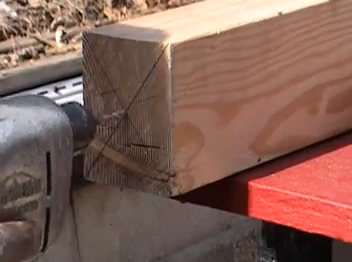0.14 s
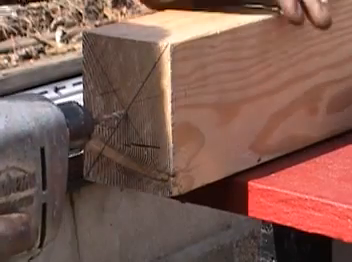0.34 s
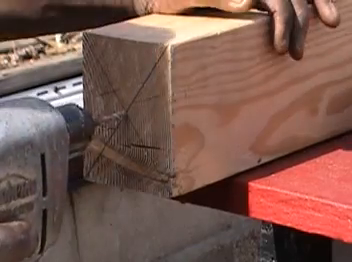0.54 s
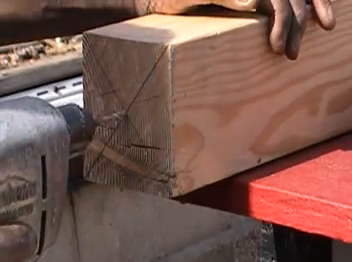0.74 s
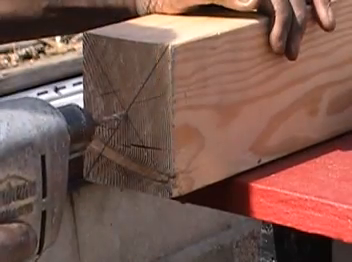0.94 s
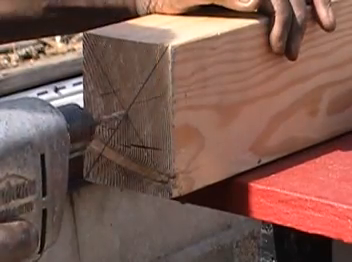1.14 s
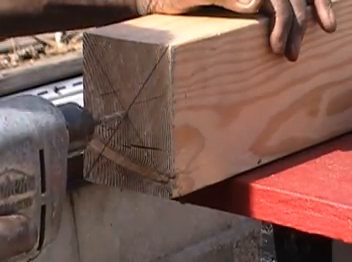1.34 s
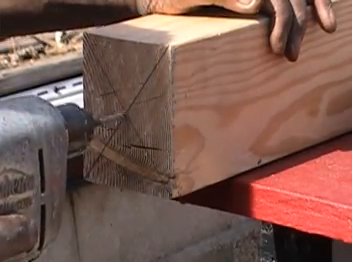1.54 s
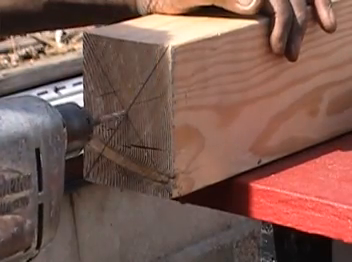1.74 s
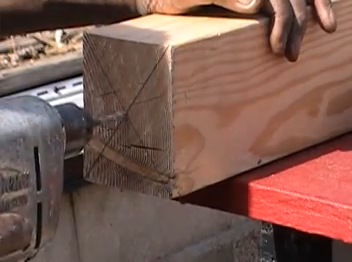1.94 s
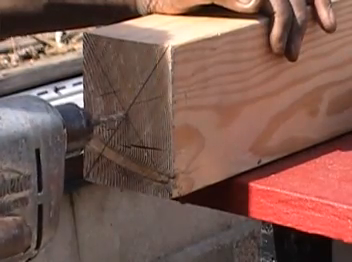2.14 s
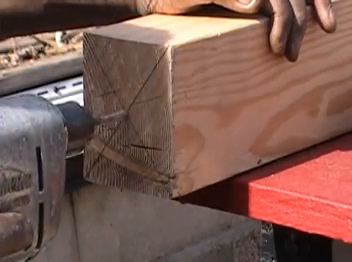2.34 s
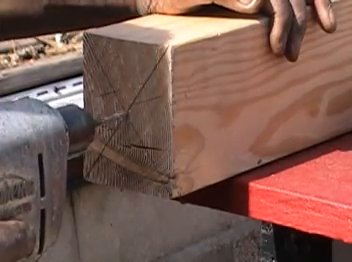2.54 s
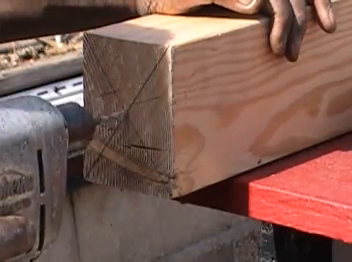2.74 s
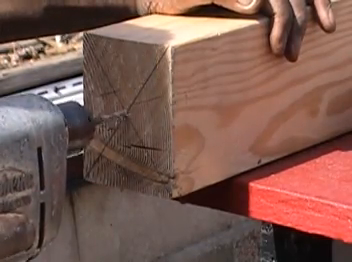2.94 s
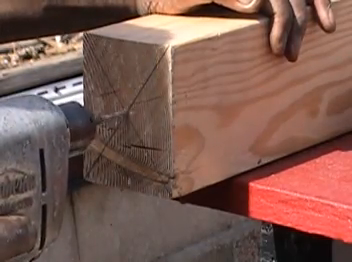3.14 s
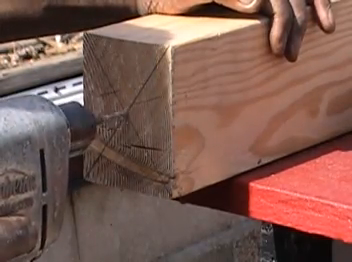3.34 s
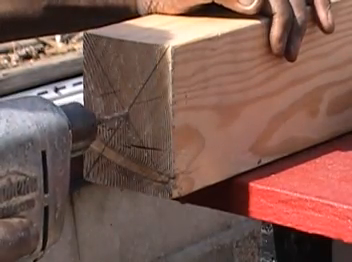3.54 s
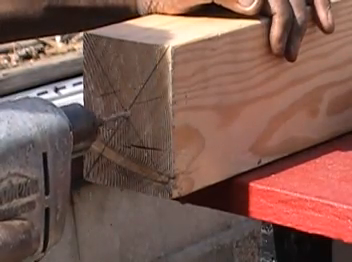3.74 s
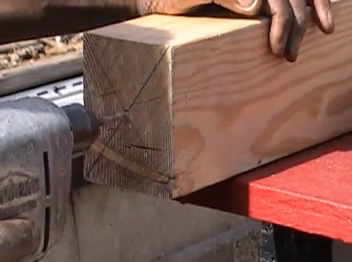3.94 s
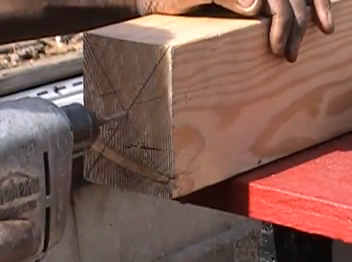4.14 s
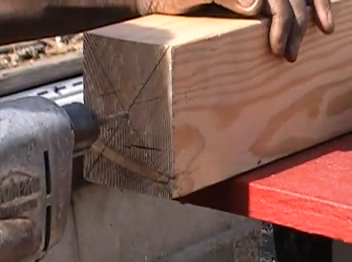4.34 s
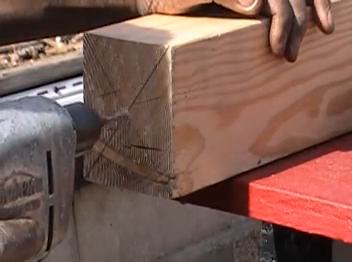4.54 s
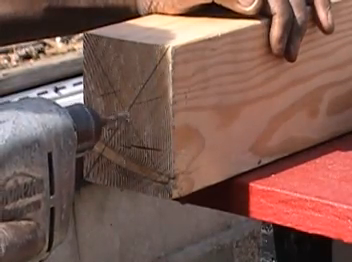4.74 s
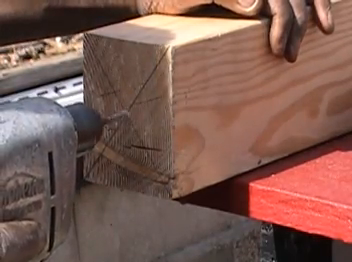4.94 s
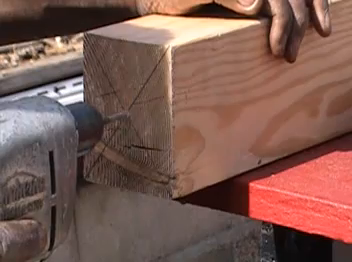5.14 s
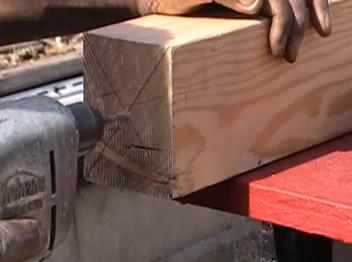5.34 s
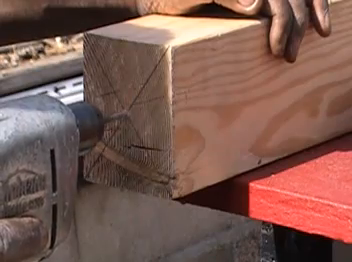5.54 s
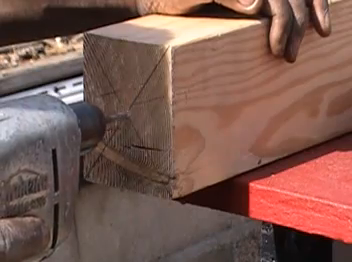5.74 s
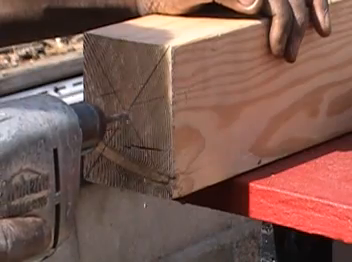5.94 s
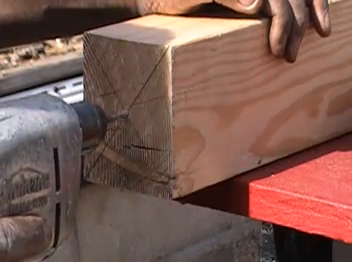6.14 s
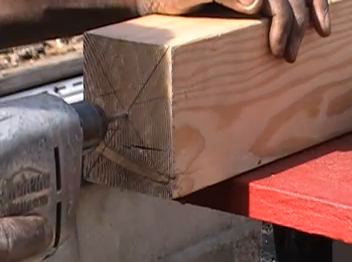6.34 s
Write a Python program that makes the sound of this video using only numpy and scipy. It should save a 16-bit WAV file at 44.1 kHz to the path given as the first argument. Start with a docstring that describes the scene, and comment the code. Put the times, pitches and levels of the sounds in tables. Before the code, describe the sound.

Soft rustles and quick small ticks in open air, then a loud clattering electric drill boring wood in two pulls, the second running to the end.

```python
"""A corded hand drill bores into the end grain of a wooden beam outdoors, a metre away.
Its loose gears rattle as dense random taps and clashes that ring the metal housing; a smoothed share
of the force drones in the beam, and wavering sines make a faint whine and a thin squeal.
Filtered noise gives the open air and rumble behind it, a gliding sine the low hum, and noise bursts the
regular ticks, single ticks, trigger click and soft rustles heard before the drill starts."""
import sys
import numpy as np
from scipy import signal
from scipy.fft import rfft, irfft
from scipy.io import wavfile
from scipy.ndimage import uniform_filter1d

SR = 44100
rng = np.random.default_rng(int(sys.argv[2]) if len(sys.argv) > 2 else 0)


def pcm_store(signal):
    """Save signal as 16-bit PCM."""
    levels = np.round(np.clip(np.atleast_2d(signal), -1, 1) * 32767)
    wavfile.write(sys.argv[1], SR, levels.astype(np.int16).T)


N = 282681
PAD = N + 8192  # room for filter tails, in samples
T = np.arange(N) / SR  # seconds
HZ = np.fft.rfftfreq(PAD, 1 / SR) + 1  # shifted by 1 Hz so its logarithm exists

# Trigger pulls. Each row: start in seconds, power cut in seconds (the last lies past the end),
# beam drone against the rattle in dB, extra drone just after the start in dB.
TRIGGER_PULLS = [(1.074, 2, -11.5, 5), (2.196, 7, -14.5, 11)]
# How hard the gears rattle as the hand leans on the drill. Each row: time in seconds, level in dB.
HAND_LOAD = [(1.07, -22.5), (1.25, -23.5), (1.35, -20.5), (1.55, -21.5), (1.68, -24.5), (1.78, -23.5),
             (1.95, -29.5), (2.04, -27), (2.19, -24), (2.3, -19.5), (2.45, -22.5), (2.65, -24),
             (2.8, -20.5), (2.98, -25.5), (3.2, -22), (3.5, -25.5), (3.7, -20.5), (3.9, -22), (4.17, -23.5),
             (4.45, -19.5), (4.6, -22.5), (4.8, -19.5), (5.0, -20.5), (5.45, -19), (5.6, -22),
             (5.75, -19.5), (6.15, -22), (6.41, -21.5)]
# Gear clashes at set times, from faint to loud. Each row: time in seconds, strength of the knock in dB.
GEAR_CLASHES = [(1.0748, -4.5), (1.1465, -2.5), (1.1643, 1), (1.1962, -4), (1.227, -10), (1.2444, 2),
                (1.2878, -13), (1.3841, -0.5), (1.4263, -1.5), (1.448, -0.5), (1.4699, -12), (1.5208, -1),
                (1.5637, -1), (1.6028, -3), (1.661, -18), (1.678, -5.5), (1.771, -2.5), (1.8948, -4.5),
                (2.191, -3), (2.231, 2), (2.2866, -4), (2.3215, -2.5), (2.354, -2), (2.3789, -2.5),
                (2.4208, -5), (2.4632, -1), (2.4973, -1), (2.596, -7), (2.618, -12), (2.6385, 2.5),
                (2.7185, 0), (2.746, -10), (2.7774, -3), (2.853, 1.5), (2.8875, -3), (2.9111, -6),
                (2.9383, -5.5), (3.0203, -1.5), (3.0624, 0), (3.0962, 0), (3.1399, -3), (3.1725, -7),
                (3.189, -7), (3.2115, -12), (3.3257, -0.5), (3.357, 1.5), (3.3768, 0), (3.407, -3.5),
                (3.4398, -2.5), (3.5056, -1), (3.614, -8), (3.647, -6), (3.7009, 2), (3.7316, -0.5),
                (3.774, -1), (3.822, 2), (3.8777, -16), (3.8958, -11), (3.9338, -2), (3.9546, -2.5),
                (4.0103, -3.5), (4.0466, 0), (4.067, 2.5), (4.1135, -6.5), (4.203, -19), (4.243, -2),
                (4.29, -2), (4.3214, -11), (4.357, -5), (4.4317, -7), (4.4612, -3), (4.5948, -3),
                (4.6194, -11), (4.6856, -25), (4.7421, 1), (4.8176, -2), (4.8567, -16), (4.8817, -8),
                (4.9234, -9), (4.954, -2.5), (4.975, -3), (5.0324, -7), (5.0966, -4), (5.152, -4),
                (5.266, -3), (5.3544, -6.5), (5.428, 0.5), (5.4519, -11), (5.48, -16), (5.5087, -0.5),
                (5.5541, -3.5), (5.5975, -10), (5.6399, -9), (5.6797, -6), (5.7556, -7), (5.819, -8),
                (5.865, -12), (5.9465, -8), (5.9762, -0.5), (6.0104, -7), (6.0274, 2), (6.06, -5),
                (6.1026, 1), (6.1628, -4), (6.1915, 0), (6.2184, -4.5), (6.3291, 0.5), (6.3485, -5),
                (6.3685, -5.5), (6.3871, -11)]
# Spectrum of the metal housing. Each row: frequency in Hz, relative level in dB per Hz.
HOUSING_SPECTRUM = [(1060, -63.5), (1800, -28), (2300, -34.5), (2470, -14.5), (2950, -20), (3440, -2),
                    (4680, -13), (5210, -5.5), (6890, -5.5), (8180, -0.5), (9280, -8.5), (10300, -10.5),
                    (13900, -23.5), (14400, -52), (15500, -56)]
# Resonances of the housing. Each row: frequency in Hz, width in Hz (at least 1/45 of it is used), hump in dB.
HOUSING_RESONANCES = [(2160, 120, 23), (3148, 86, 9), (3530, 160, -3), (4140, 50, 0), (5343, 67, 5.5),
                      (5930, 42, 3.5), (6340, 200, 2.5), (6700, 73, 2.5), (7550, 640, 4), (8440, 320, 4.5),
                      (9090, 40, 7.5), (9500, 630, 6.5), (11340, 160, 4)]
# Spectrum of the wooden beam. Each row: frequency in Hz, relative level in dB per Hz.
BEAM_SPECTRUM = [(59, -60), (100, -17), (308, -9.5), (421, -7.5), (514, -7.5), (627, -4), (1170, -3.5),
                 (3000, 1.5), (3900, -47), (6600, -120)]
# Resonances of the beam. Each row: frequency in Hz, width in Hz, hump in dB.
BEAM_RESONANCES = [(934, 56, 7), (1042, 46, 5), (1740, 270, 1)]
# Low rings of the beam, which change strength as the hole deepens.
# Each row: frequency in Hz, width in Hz, level in a shallow hole and in a deep one in dB against the push.
BEAM_LOW_RESONANCES = [(125, 50, -25, -35.5), (199, 75, -21, -28), (426.5, 34, -21, -18.5),
                       (640.4, 51, -21, -17), (1357, 48, -12.5, -22)]
# Whine, one list for each spell. Each row: time in seconds, centre pitch in Hz, centre level in dB.
WHINE_SPELLS = [
    [(1.72, 1710, -40), (1.85, 1723, -43), (2.05, 1750, -47), (2.18, 1713, -58)],
    [(2.7, 1440, -68), (2.8, 1484, -38), (2.92, 1550, -56), (3.05, 1556, -44)],
    [(6.05, 1594, -56), (6.2, 1620, -44), (6.41, 1630, -41)],
]
# Thin high ring. Each row: time in seconds, centre level in dB.
SQUEAL_LEVEL = [(1.2, -57), (1.4, -50), (1.7, -44), (1.9, -47), (2.05, -58)]
# Stereo balance of the drill. Each row: frequency in Hz, left minus right of the shared sound in dB,
# gain of the unrelated part in dB.
STEREO_BALANCE = [(300, -0.9, -66), (930, -0.3, -60), (3600, 0.1, -70.5), (4180, 0, -8), (5300, 5, -10.5),
                  (7200, 1.5, -13), (9600, 0, -15), (11300, -7, 1.5), (12750, -9, 3), (14900, 29, -2)]
# Single ticks, the last two the click of the trigger.
# Each row: time in seconds, strength of the body in dB, edge against body in dB.
SINGLE_TICKS = [(0.2183, -56, 8), (0.5988, -45, -3), (1.038, -43, -10), (1.046, -52, 5)]
# Body rings of a tick. Each row: frequency in Hz, width in Hz, relative level in dB.
TICK_RESONANCES = [(1000, 600, 3), (2300, 900, 0), (3500, 900, -4), (4700, 900, -9)]
# Soft high rustles. Each row: loudest moment in seconds, relative level in dB, Gaussian spread in seconds.
RUSTLE_PUFFS = [(0.048, -66, 0.033), (0.501, -54.5, 0.008), (0.54, -59, 0.007), (.815, -68, 0.0045)]
# Spectrum of the open air. Each row: frequency in Hz, relative level in dB per Hz.
AIR_SPECTRUM = [(12, -6), (20, 13.5), (71, -5), (170, -7), (373, -3), (1070, -9), (3640, -23.5),
                (5040, -32), (8200, -31), (11400, -33), (13000, -61)]
# Stereo spread of the air. Each row: frequency in Hz, gain of the side signal in dB.
AIR_SIDE_GAIN = [(60, -14), (300, -15), (1300, -9), (3000, -5), (7000, -1)]
# Swelling rumble. Each row: time in seconds, relative level in dB.
RUMBLE_SWELL = [(0.0, -55), (0.46, -46.5), (1.3, -59), (1.55, -45), (2.0, -49), (2.7, -58), (3.0, -66),
                (4.8, -59.5), (6.41, -62)]
# Gliding low hum. Each row: time in seconds, pitch in Hz, relative level in dB.
HUM_GLIDE = [(0.0, 81, -59), (0.074, 86.3, -75), (0.37, 68, -55.5), (1.22, 69.8, -56.5), (1.344, 77.5, -66),
             (1.5, 74.5, -68)]

SPIN_UP_S, START_DB = 0.008, -5  # the motor's drive starts this much softer and swells
COAST_DB_PER_S, COAST_DRONE_DB_PER_S = -180, -130  # run-down of rattle and drone once the power is cut
JOLT_S = 0.063  # settling time of the extra drone
TAPS_PER_S = 600
WOBBLE_DB, FLUTTER_DB = 0.56, 2  # slow and quick unevenness of the rattle
WOBBLE_PER_S, FLUTTER_PER_S = 60, 200
MAINS_RIPPLE_HZ, RIPPLE_DB = 120, 0.5
SMALL_CLASHES_PER_S = 25
SMALL_CLASH_DB, SMALL_CLASH_SPREAD_DB = 6.5, 2  # strength against the rattle
BOUNCE_S, BOUNCE_GAIN = 0.00324, 0.41
CHATTER_DB = -24  # against the strength of the knock
TOP_END_HZ, TOP_END_BLUR = 10800, 0.79  # above this the drill sounds smoother, like fan hiss: smeared share
DEEPENS_S, DEEPENS_OVER_S = 2.97, 0.14
SQUEAL_HZ = 11420
# a steady train of small ticks that fades towards its end
TRAIN_START_S, TRAIN_PERIOD_S, TRAIN_COUNT = .2418, .0669, 11
TRAIN_DB, TRAIN_EDGE_DB, TRAIN_SPREAD_DB = -42.5, -12, 2.5  # body strength, edge gain, random spread
TRAIN_FADES_S, TRAIN_FADE_DB_PER_S = .7, -29
AIR_MID_DB, AIR_SIDE_DB = -50.5, -53  # rms before the final filters
TOP_HZ = 15700


def drill():
    """Gear force rings the housing and pushes the beam; tonal rings, whine and squeal lie on top."""
    load_db = curve([HAND_LOAD], column=1, outside=-23)
    rattle_db = load_db + trigger(COAST_DB_PER_S)
    drone_level_db = load_db + trigger(COAST_DRONE_DB_PER_S) + drone_db()
    shake, knocks = rattle(), clashes(rattle_db)
    force = undb(rattle_db) * shake + knocks
    push = undb(drone_level_db) * level(fade(shake, 0.0047), 0)
    push += undb(-36) * uniform_filter1d(knocks, size=200)
    shared, unrelated = [housing(f) + beam(push) for f in contact_forces(force)]
    return stereo(shared + beam_low_rings(push) + whine() + squeal(), unrelated)


def trigger(coast_db_per_s):
    """Motor drive in dB: off, a quick swell at each pull, a steady fall once the power is cut."""
    out = np.full(N, -90.)
    for on, cut, *_ in TRIGGER_PULLS:
        swell = START_DB * np.exp(-(T - on).clip(0) / SPIN_UP_S)
        coast = coast_db_per_s * (T - cut).clip(0)
        out[T >= on] = (swell + coast)[T >= on]
    return out


def rattle():
    """Force on the gear teeth: random uneven taps that bunch up as the bit wobbles and the torque ripples."""
    bunch = undb(WOBBLE_DB * walk(WOBBLE_PER_S) + FLUTTER_DB * walk(FLUTTER_PER_S))
    ripple = undb(RIPPLE_DB * np.sin(2 * np.pi * MAINS_RIPPLE_HZ * T))
    size = undb(np.minimum(2.5 * rng.exponential(size=N), 9))
    taps = (rng.random(N) < TAPS_PER_S / SR) * size
    return level(bunch * ripple * (fade(taps, 0.0002) + 0.63), 0)


def clashes(rattle_db):
    """Force of the knocks: a sharp peak that bounces once, with brief chatter around the timed ones."""
    small_db = rattle_db + SMALL_CLASH_DB + SMALL_CLASH_SPREAD_DB * noise()
    small = (rng.random(N) < SMALL_CLASHES_PER_S / SR) * undb(small_db)
    timed = np.zeros(N)
    for s, db in GEAR_CLASHES:
        timed[int(s * SR)] = undb(db)
    hits = timed + small
    bounced = hits + BOUNCE_GAIN * np.roll(hits, int(BOUNCE_S * SR))
    sharp = fade(fade(bounced, 0.00016), 0.00069) / (0.00036 * SR)
    chatter = np.convolve(timed, np.hanning(400), "same")
    return sharp + undb(CHATTER_DB) * chatter


def contact_forces(force):
    """Crisp force with a partly smeared top end, and a smoothed noisy copy for the unrelated stereo part."""
    blurred = np.sqrt(fade(force ** 2, 0.0031) / (0.0043 * SR))
    crisp = force * np.sign(noise())  # each contact pushes one way or the other
    smear_in = np.sqrt(TOP_END_BLUR) * blurred * noise()
    crisp_out = (1 - np.sqrt(1 - TOP_END_BLUR)) * crisp
    top = signal.butter(4, TOP_END_HZ, "high", fs=SR, output="sos")
    crisp += signal.sosfiltfilt(top, smear_in - crisp_out)
    return crisp, blurred * noise()


def housing(force):
    """The metal housing rings under the gear force."""
    return colour(force, even(shape(HOUSING_SPECTRUM, rings=HOUSING_RESONANCES)))


def beam(push):
    """The wooden beam drones: noise under the push, coloured by the wood."""
    return colour(push * noise(), even(shape(BEAM_SPECTRUM, rings=BEAM_RESONANCES)))


def drone_db():
    """Beam drone against the rattle in dB: a jolt at each start that settles."""
    out = np.zeros(N)
    for on, _, below_db, jolt_db in TRIGGER_PULLS:
        out[T >= on] = (below_db + jolt_db * np.exp(-(T - on).clip(0) / JOLT_S))[T >= on]
    return out


def beam_low_rings(push):
    """Narrow noise bands ride on the push and change strength as the hole deepens."""
    depth = 1 / (1 + np.exp(-(T - DEEPENS_S) / DEEPENS_OVER_S))
    out = np.zeros(N)
    for hz, width, shallow_db, deep_db in BEAM_LOW_RESONANCES:
        ring = level(band(noise(), hz - width / 2, hz + width / 2), 0)
        out += push * undb(shallow_db + (deep_db - shallow_db) * depth) * ring
    return out


def whine():
    """An unsteady sine follows the pitch and level of each spell."""
    hz = curve(WHINE_SPELLS, column=1, outside=1500)
    return waver(hz, curve(WHINE_SPELLS, column=2, outside=-160), 16)


def squeal():
    """A thin high sine wavers around one pitch."""
    return waver(SQUEAL_HZ, curve([SQUEAL_LEVEL], column=1, outside=-160), 40.3)


def stereo(shared, unrelated):
    """Weight the shared sound left or right by frequency and add an unrelated part, inverted on the right."""
    tilt = shape(STEREO_BALANCE) / 2
    side = weigh(unrelated, shape(STEREO_BALANCE, column=2))
    return np.array([weigh(shared, s * tilt) + s * side for s in (1, -1)])


def ticks():
    """Small dry ticks and the trigger click: decaying noise in a few body bands, with an edge in the treble."""
    body, edge = np.zeros((2, N))
    times = TRAIN_START_S + TRAIN_PERIOD_S * np.arange(TRAIN_COUNT)
    chance = TRAIN_SPREAD_DB * rng.standard_normal((TRAIN_COUNT, 2))
    train_db = TRAIN_DB + TRAIN_FADE_DB_PER_S * (times - TRAIN_FADES_S).clip(0) + chance[:, 0]
    train = list(zip(times, train_db, TRAIN_EDGE_DB + chance[:, 1]))
    for s, db, edge_db in train + SINGLE_TICKS:
        body[int(s * SR)] = undb(db)
        edge[int(s * SR)] = undb(db + edge_db)
    swell = uniform_filter1d(fade(body, 0.0029), size=90)
    ring = sum(undb(db) * band(swell * noise(), f - w / 2, f + w / 2) for f, w, db in TICK_RESONANCES)
    return undb(6.0) * ring + band(fade(edge, 0.0018) * noise(), 4200, 8700)


def rustles():
    """Brief puffs of high hiss: noise under Gaussian swells."""
    swell = sum(undb(db) * np.exp(-((T - s) / width) ** 2 / 2) for s, db, width in RUSTLE_PUFFS)
    return 2 * band(band(swell * noise(), 5500, 11000), 5500, 11000)


def outdoors():
    """Far traffic and air as wide noise, with the rumble and hum."""
    drift = undb(1.2 * walk(7.4))
    air = level(colour(noise(), shape(AIR_SPECTRUM)) * drift, AIR_MID_DB)
    side = level(colour(noise(), shape(AIR_SPECTRUM)), AIR_SIDE_DB)
    side = weigh(side, shape(AIR_SIDE_GAIN))
    mid = band(air, 135, 9800) + rumble() + hum()
    apart = band(side, 130, 12000) + undb(-20.5) * rumble()
    return mid + apart * np.array([[1], [-1]])


def rumble():
    """Low band of noise that swells and sinks."""
    swell = undb(curve([RUMBLE_SWELL], column=1, outside=-90))
    return level(band(noise(), 38, 142), -6) * swell


def hum():
    """A low sine glides in pitch and level."""
    phase = 2 * np.pi * np.cumsum(curve([HUM_GLIDE], column=1, outside=78)) / SR
    return np.sin(phase) * undb(curve([HUM_GLIDE], column=2, outside=-96) + 2.5)


def undb(db):
    """dB to gain."""
    return 10 ** (np.asarray(db) / 20)


def level(x, db):
    """Scale to an rms in dB."""
    return x * undb(db) / np.sqrt(np.mean(x ** 2))


def noise():
    """White noise."""
    return rng.standard_normal(N)


def walk(rate):
    """Random levels held 1 / rate seconds and smoothed twice; spread near 1."""
    k = int(SR / rate)
    steps = np.repeat(rng.standard_normal(N // k + 1), k)
    return 1.43 * uniform_filter1d(uniform_filter1d(steps, k), k)[:N]


def curve(tables, column, outside):
    """One column of several spans over time, constant between them."""
    out = np.full(N, float(outside))
    for rows in map(np.array, tables):
        inside = (T >= rows[0, 0]) & (T <= rows[-1, 0])
        out[inside] = np.interp(T[inside], rows[:, 0], rows[:, column])
    return out


def waver(hz, db, wobble_hz):
    """A sine whose pitch and level are unsteady."""
    phase = 2 * np.pi * np.cumsum(hz + wobble_hz * walk(80)) / SR
    return np.sin(phase) * undb(db + 1.5 * walk(50))


def fade(x, seconds):
    """Each impulse dies away exponentially."""
    return signal.lfilter([1], [1, -np.exp(-1 / (seconds * SR))], x)


def band(x, lo_hz, hi_hz):
    """Band-pass."""
    return signal.sosfilt(signal.butter(2, [lo_hz, hi_hz], "band", fs=SR, output="sos"), x)


def shape(points, column=1, rings=()):
    """dB at every frequency: a smooth spectrum with resonance humps."""
    p = np.array(points)
    humps = sum(db / (1 + (2 * (HZ - f) / max(w, f / 45)) ** 2) for f, w, db in rings)
    return np.interp(np.log(HZ), np.log(p[:, 0]), p[:, column]) + humps


def even(db):
    """The same spectrum, shifted so that white noise keeps its power."""
    return db - 10 * np.log10(np.mean(undb(2 * db)))


def colour(x, db):
    """Causal filter with the given gain, its phase taken from the cepstrum."""
    c = irfft(np.log(10) * db / 20, PAD)
    c[1:PAD // 2] *= 2  # fold the cepstrum onto positive time
    c[PAD // 2 + 1:] = 0
    return irfft(rfft(x, PAD) * np.exp(rfft(c)), PAD)[:N]


def weigh(x, db):
    """Gain by frequency without delay."""
    return irfft(rfft(x, PAD) * undb(db), PAD)[:N]


def scene():
    """Drill, the small sounds before it and the open air."""
    return drill() + ticks() + rustles() + outdoors()


def record(dry):
    """Peaks beyond 0.82 flatten, then a steep low-pass cuts the top."""
    low_pass = signal.ellip(12, .2, 90, TOP_HZ, fs=SR, output="sos")
    return signal.sosfilt(low_pass, np.clip(dry, -.82, .82))


dry = scene()
out = record(dry)
pcm_store(out)
```